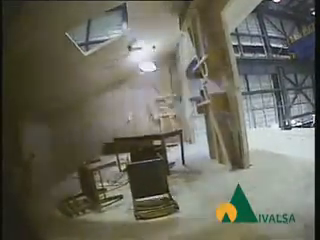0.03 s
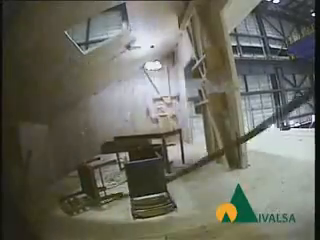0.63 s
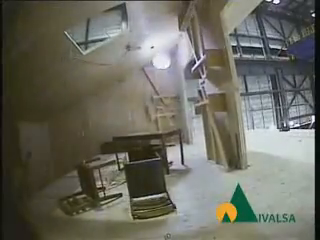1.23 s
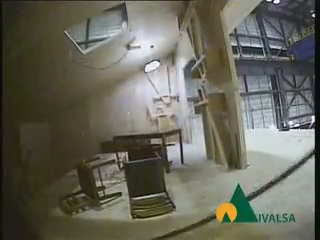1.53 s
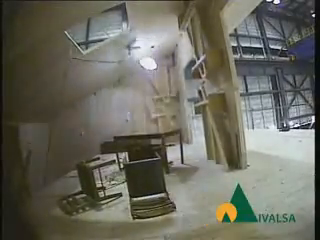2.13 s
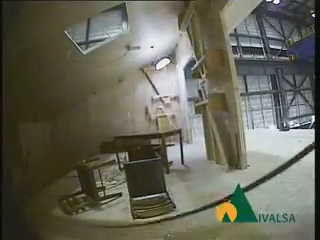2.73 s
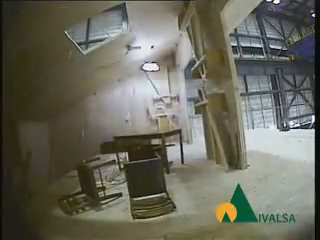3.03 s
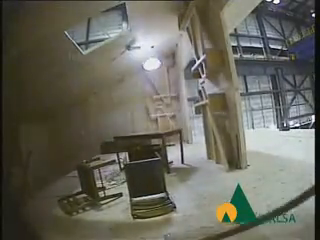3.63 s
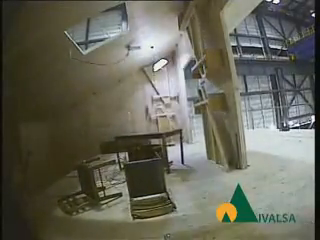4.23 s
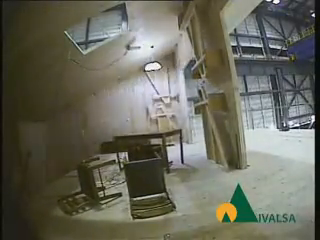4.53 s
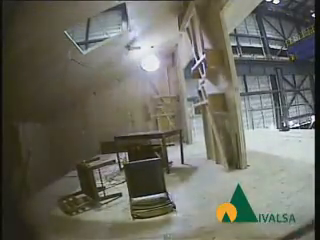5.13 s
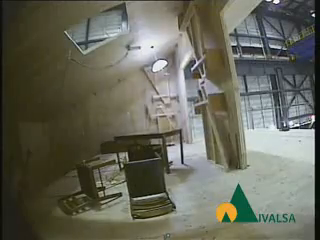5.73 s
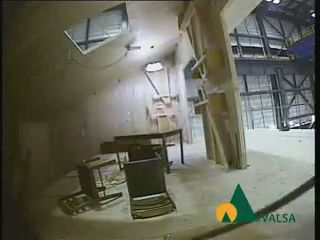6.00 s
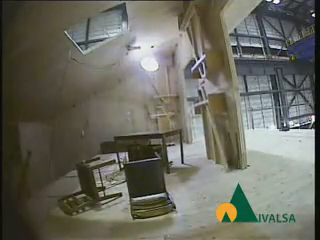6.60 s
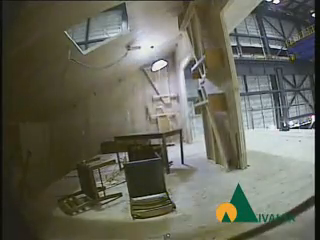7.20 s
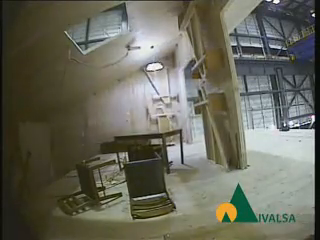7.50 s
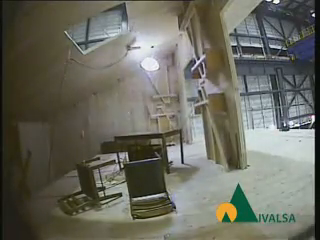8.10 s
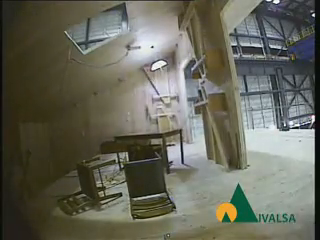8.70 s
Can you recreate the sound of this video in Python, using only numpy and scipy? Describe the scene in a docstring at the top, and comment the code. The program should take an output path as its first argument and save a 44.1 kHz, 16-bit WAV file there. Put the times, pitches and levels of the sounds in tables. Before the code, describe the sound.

Furniture crashes and rattles over a deep rumble inside a shaking wooden house, giving way to thumps and hydraulic whine.

```python
"""Rumble, clatter and banging furniture, choked briefly by hard lurches: inside a timber house shaken on a
hydraulic platform in a large hall. Joints crack, legs squeak, metal parts clink and panels boom.
Valves hiss throughout; as the shaking eases, the frame thumps and the pumps throb and whine louder.
Each hard lurch pumps the room air and pins the microphone amplifier. Only the left channel is live."""
import sys
import numpy as np
from scipy import signal
from scipy.fft import rfft, irfft, next_fast_len
from scipy.io import wavfile
from scipy.ndimage import uniform_filter1d

SR = 44100
rng = np.random.default_rng(int(sys.argv[2]) if len(sys.argv) > 2 else 0)


def master_out(mix):
    """Clip the mix to full scale and print it as 16-bit PCM to the path in sys.argv[1]."""
    frames = np.transpose(np.atleast_2d(mix))
    ceiling = np.clip(frames, -1, 1)
    pcm = np.round(ceiling * 32767).astype(np.int16)
    wavfile.write(sys.argv[1], SR, pcm)


N = 394694
T = np.arange(N) / SR

# low resonances of platform and frame: f/Hz, half-width/Hz, level/dB
FRAME_MODES = [(64.2, 13, 3), (127.8, 12, -0.5)]
# modes of the metal fittings: f/Hz, level/dB, t60/s
FITTING_MODES = [(2820, -2, 0.93), (3450, -4, 0.2), (3640, 4, 0.21), (3780, -1.5, 0.55)]
# spectrum of a wooden snap: f/Hz, level/dB
SNAP_SPECTRUM = [(300, -21), (1300, 8.5), (2200, 8), (3400, 11.5), (4500, -1), (6500, -2), (9500, -16.5)]
# furniture hitting floor and walls: t/s, thud/dB, most excited f/Hz, snap/dB, rattle/dB
FURNITURE_HITS = [(0.286, -18, 328, -42.5, -45), (.328, -25.5, 1040, -43, -50),
                  (0.395, -26.5, 1210, -38.5, -53), (0.478, -26, 960, -40.5, -50),
                  (0.636, -24.5, 1380, -47, -41), (.66, -19, 600, -46, -54), (0.791, -25.5, 617, -51, -56),
                  (1.039, -28.5, 706, -44, -41.5), (1.35, -17.5, 886, -40.5, -32),
                  (1.424, -23, 586, -45, -44), (1.489, -22, 990, -45.5, -42.5),
                  (1.655, -25.5, 1010, -42.5, -45.5), (1.705, -20, 690, -48, -47.5),
                  (1.79, -18.5, 397, -58, -58), (2.3, -23.5, 352, -62, -63.5),
                  (2.872, -25.5, 710, -58, -53), (3.281, -21, 790, -44, -53), (3.306, -16.5, 504, -54, -57),
                  (3.386, -18.5, 563, -53.5, -54), (3.815, -37, 980, -46.5, -46.5),
                  (4.049, -30.5, 700, -60, -61.5), (5.734, -31.5, 1260, -60.5, -65)]


def amp(db):
    """Decibels to gain."""
    return 10 ** (np.asarray(db) / 20)


def falloff(t, t60_s):
    """Gain falling 60 dB in t60_s."""
    return amp(-60 * t / t60_s)


def unit(x):
    """Scales to rms 1."""
    return x / np.sqrt(np.mean(x ** 2) + 1e-20)


def level(rows, column=1):
    """Gain over time from a dB column."""
    rows = np.array(rows)
    return amp(np.interp(T, rows[:, 0], rows[:, column]))


def read(points, hz):
    """Reads a table on a log-frequency axis."""
    f, value = np.transpose(points)
    return np.interp(np.log(hz + 1), np.log(f + 1), value)


def colour(x, spectrum):
    """Filters x by a spectrum; rms 1."""
    gain = amp(read(spectrum, np.fft.rfftfreq(len(x), 1 / SR)))
    return unit(irfft(rfft(x) * gain, len(x)))


def noise(spectrum, size=N):
    """Steady coloured noise."""
    return colour(rng.standard_normal(next_fast_len(size)), spectrum)[:size]


def resonance(hz, half_width_hz, size=N):
    """Noise-driven resonance, rms 1; at 0 Hz, a random wander."""
    padded = next_fast_len(size)
    offset = (np.fft.rfftfreq(padded, 1 / SR) - hz) / half_width_hz
    return unit(irfft(rfft(rng.standard_normal(padded)) / (1 + offset ** 2), padded)[:size])


def add(mix, s, sound):
    """Adds a sound at time s."""
    part = mix[max(round(s * SR), 0):][:len(sound)]
    part += sound[:len(part)]


def ring(modes, detune):
    """One blow: randomly detuned modes start together and decay; rms 1 over the first 20 ms."""
    t, out = np.arange(SR // 2) / SR, 0
    for hz, db, t60_s in modes:
        tuned_hz = hz * (1 + detune * rng.uniform(-1.03, 1))
        out += rng.choice([-1, 1]) * amp(db) * falloff(t, t60_s) * np.sin(2 * np.pi * tuned_hz * t)
    return out / np.sqrt(np.mean(out[:SR // 50] ** 2))


def impacts(spectrum, per_s, spread_db, t60_s, objects):
    """Loose objects, each with its own short ring, struck at random with uneven force."""
    t, out = np.arange(SR // 8) / SR, np.zeros(next_fast_len(N))
    for _ in range(objects):
        force = amp(spread_db * np.minimum(rng.exponential(1, N), 3))
        blows = force * (rng.random(N) < per_s / objects / SR)
        body = rng.standard_normal(len(t)) * falloff(t, t60_s)
        out[:N] += signal.oaconvolve(blows, body)[:N]
    return colour(out, spectrum)[:N]


def hall(x, wet_db):
    """Adds the hall's diffuse tail."""
    reverb_times = [(1000, 0.92), (4000, 0.89), (9000, 1)]  # f/Hz, t60/s
    hz, t, bands = signal.stft(rng.standard_normal(SR), SR, nperseg=256)
    tail = signal.istft(bands * falloff(t, read(reverb_times, hz)[:, None]), SR, nperseg=256)[1]
    wet = signal.oaconvolve(x, tail / np.linalg.norm(tail))[:N]
    return (x + amp(wet_db) * wet) / np.hypot(1, amp(wet_db))


def shaken(db, exponent):
    """Gain of a layer growing as a power of the shaking force; db applies at 0 dB force."""
    force = [(0, -1), (.15, -9.5), (.33, 1), (.85, 3), (1.05, -0.5), (1.36, 2), (1.6, -1), (1.8, 1.5),
             (2.02, -3.5), (2.3, 0.5), (2.55, -0.5), (3.33, 2), (3.58, -0.5), (3.9, 0), (4.25, -3.5),
             (5.45, -6), (5.8, -5.5), (8.95, -7)]  # surges, then eases: t/s, level/dB
    return amp(db) * level(force) ** exponent


def hydraulics(whine_hz=529.4):
    """Oil hisses through valves; the pumps throb and whine unsteadily."""
    pump_load = [(0, -48.5, -34, -28.5), (5.3, -48.5, -25, -36.5), (6.3, -41, -18.5, -31.5),
                 (7.9, -37, -20.5, -30), (8.3, -37.5, -16, -32), (8.95, -44, -17.5, -29.5)]  # t/s, whine/dB, throb/dB, hiss/dB
    hiss_spectrum = [(100, 14.5), (320, 6.5), (450, -6), (750, -9), (1000, 3), (1400, -5), (1900, -22.5),
                     (2900, -28), (3550, -26), (4400, -37.5), (6400, -35.5), (9500, -51)]  # f/Hz, level/dB
    cycles = np.cumsum(whine_hz * (1 + 0.0027 * resonance(0, 5.25))) / SR
    whine = np.sqrt(2) * np.sin(2 * np.pi * cycles) * amp(1.6 * resonance(0, 17))
    throb = unit(sum(amp(db) * resonance(hz, half_width_hz) for hz, half_width_hz, db in FRAME_MODES))
    hiss = noise(hiss_spectrum)
    return whine * level(pump_load, 1) + throb * level(pump_load, 2) + hiss * level(pump_load, 3)


def joint_cracks():
    """A timber joint lets go with a snap that rings its fittings; the room carries it on."""
    cracks = [(3.801, -60, 0.78), (4.213, -56, 0.53), (4.768, -55, 0.64), (5.252, -55.5, 0.85),
              (5.52, -48, 1), (5.695, -53.5, 0.45), (6.2297, -49.5, 1), (6.367, -51.5, 0.51),
              (6.542, -47, 0.6), (6.686, -56, 0.61), (6.868, -51.5, 0.91), (7.206, -58, 0.3),
              (7.387, -51, 0.89), (8.031, -55, 0.44)]  # t/s, level/dB, tail t60/s
    t, out = np.arange(SR // 2) / SR, np.zeros(N)
    attack = 1 - np.exp(-t / 0.00065)
    for start_s, db, t60_s in cracks:
        snap = noise(SNAP_SPECTRUM, len(t)) * (falloff(t, .05) + amp(-4) * falloff(t, t60_s))
        jangle = amp(-10) * ring(FITTING_MODES, detune=0.065)
        add(out, start_s, amp(db) * (snap + jangle) * attack)
    return out


def metal_clinks(db_per_octave=23.5, blur_hz=45):
    """Small metal parts ring over a bright chatter; repeated contact blurs each mode."""
    clinks = [(0.927, -47, -38.5, 0.032, 9200), (1.042, -56, -41.5, 0.35, 7610),
              (3.595, -56, -44.5, 0.048, 8620), (3.805, -60, -49.5, 0.19, 8150),
              (7.595, -66.5, -64, 0.7, 5585)]  # t/s, ring/dB, chatter/dB, t60/s, most excited f/Hz
    metal_modes = [(5585, 0.5), (6780, -2), (7610, 5), (8150, 4.5), (8620, -7), (9400, -9)]  # f/Hz, level/dB
    chatter_spectrum = [(1500, -16.5), (3700, 8.5), (5000, -2.5), (9500, -6.0)]  # f/Hz, level/dB
    t, out = np.arange(SR // 2) / SR, np.zeros(N)
    for start_s, ring_db, chatter_db, t60_s, pitch_hz in clinks:
        struck = [(hz, db - db_per_octave * abs(np.log2(hz / pitch_hz))) for hz, db in metal_modes]
        tones = unit(sum(amp(db) * resonance(hz, blur_hz, len(t)) for hz, db in struck))
        chatter = noise(chatter_spectrum, len(t)) * falloff(t, .6)
        add(out, start_s, (amp(ring_db) * tones + amp(chatter_db) * chatter) * falloff(t, t60_s))
    return hall(out, wet_db=-5.5)


def leg_squeaks(scrape_db=-10.5, fade_db=7.5):
    """Furniture legs stick and slip: a rough tone over a scrape, fading as the leg comes to rest."""
    squeaks = [(1.1, 0.061, 1093, -33), (3.805, 0.088, 1050, -24.5), (4.783, 0.13, 950, -37),
               (5.529, 0.064, 1042, -28.5), (5.639, 0.13, 1017, -36), (6.04, 0.19, 1166, -42.5),
               (6.431, 0.061, 960, -34)]  # t/s, length/s, f/Hz, level/dB
    out, jitter = np.zeros(N), resonance(0, 240)
    for start_s, length_s, hz, db in squeaks:
        slip = jitter[(T > start_s) & (T < start_s + length_s)]
        size = len(slip)
        tone = np.sin(2 * np.pi * np.cumsum(hz * (1 + .072 * slip)) / SR)
        scrape = amp(scrape_db) * resonance(hz, hz / 2, size)
        fade = amp(-fade_db * np.linspace(0, 1, size))
        add(out, start_s, amp(db) * unit((tone + scrape) * fade) * signal.windows.tukey(size, .05))
    return hall(out, wet_db=-1.0)


def panel_booms(rise_s=0.016):
    """A flexing wall or floor panel lets go and drones in a broad, low resonance."""
    booms = [(3.29, -24, 434, 0.74), (5.73, -23.5, 273, 2.1), (6.83, -22, 246, 1.3),
             (7.769, -24, 297, 1.12), (8.8, -20, 183, 2.5)]  # t/s, level/dB, f/Hz, t60/s
    t, out = np.arange(SR) / SR, np.zeros(N)
    for start_s, db, hz, t60_s in booms:
        envelope = np.minimum(t / rise_s, 1) * falloff(t, t60_s)
        add(out, start_s, amp(db) * resonance(hz, 0.25 * hz, len(t)) * envelope)
    return out


def frame_thumps(rise_s=0.016, t60_s=.5):
    """The frame drops back onto its base, ringing its low modes."""
    thumps = [(5.389, -19), (5.70, -17.5), (6.439, -18), (6.817, -14), (7.15, -14.5), (7.27, -12.5),
              (7.82, -15.5), (8.33, -16.5)]  # t/s, level/dB
    modes = [(hz, db, t60_s) for hz, _, db in FRAME_MODES]
    t, out = np.arange(SR // 2) / SR, np.zeros(N)
    for start_s, db in thumps:
        add(out, start_s, amp(db) * ring(modes, detune=.1) * np.minimum(t / rise_s, 1))
    return out


def fitting_rattle(rise_s=0.0033, settle_t60_s=0.98):
    """Loose fittings rattle a little with the shaking and in a dying flurry after each bang."""
    spectrum = [(400, -18), (1300, 16), (2000, 4.5), (2900, 1), (3650, 7), (4400, -15), (6500, -10.5),
                (9500, -29.5)]  # f/Hz, level/dB
    power = shaken(-54.5, exponent=0.88) ** 2
    for start_s, *_, db in FURNITURE_HITS:
        age_s = np.maximum(T - start_s, 0)
        power += (amp(db) * np.minimum(age_s / rise_s, 1) * falloff(age_s, settle_t60_s)) ** 2
    ticks = impacts(spectrum, per_s=160, spread_db=2.0, t60_s=0.032, objects=8)
    return unit(hall(ticks, wet_db=-5.0)) * np.sqrt(power)


def board_clatter():
    """Boards knock about, louder with harder shaking."""
    spectrum = [(90, -13.5), (190, -1.5), (260, 5), (350, 2), (480, -4.5), (700, -6.5), (1000, -11.5),
                (1400, -17), (2000, -32), (9000, -75.5)]  # f/Hz, level/dB
    knocks = impacts(spectrum, per_s=200, spread_db=3.0, t60_s=0.054, objects=12)
    return unit(hall(knocks, wet_db=-4.5)) * shaken(-25.5, exponent=1.18)


def furniture_bangs(contacts=3, bounce_s=0.024, bounce_db=-6, db_per_octave=9):
    """A chair or table lands and bounces to rest; each contact is a thud, a snap and a jangle."""
    wood_modes = [(69, 17, 0.38), (191.1, 14, 0.43), (347.8, 6.5, 0.15), (494.7, -2.5, 0.19),
                  (666.7, -4.5, 0.16), (943, -0.5, 0.086), (1290, 3, 0.034), (1603, -11.5, 0.14)]  # floor and furniture: f/Hz, level/dB, t60/s
    t, out = np.arange(SR // 2) / SR, np.zeros(N)
    snap_envelope = (1 - np.exp(-t / 0.0033)) * falloff(t, 0.36)  # soft rise: legs and rails land in turn
    for start_s, thud_db, pitch_hz, snap_db, rattle_db in FURNITURE_HITS:
        struck = [(hz, db - db_per_octave * abs(np.log2(hz / pitch_hz)), t60_s)
                  for hz, db, t60_s in wood_modes]
        for k in range(contacts):
            snap = amp(snap_db) * noise(SNAP_SPECTRUM, len(t)) * snap_envelope
            thud = amp(thud_db) * ring(struck, detune=.12)
            jangle = amp(rattle_db - 13) * ring(FITTING_MODES, detune=.015)
            contact_s = start_s + k * bounce_s * rng.uniform(.75, 1.1)
            add(out, contact_s, amp(k * bounce_db) * (thud + snap + jangle))
    return hall(out, wet_db=-5.5)


def frame_rumble(rock_hz=6.67, swell_db=2.5):
    """The shaken frame rumbles, swelling and sinking as it rocks."""
    spectrum = [(14, -19.5), (26, 3.5), (42, -6.5), (64, 1.5), (95, -7), (130, -6), (195, -7.5), (270, -16),
                (1500, -89)]  # f/Hz, level/dB
    return noise(spectrum) * shaken(-16, exponent=1) * amp(swell_db * resonance(rock_hz, 1.8))


def air_pressure(trough=0.37, crest=0.29):
    """Swaying walls pump the room below hearing; a lurch is a trough and jolt between two crests."""
    lurches = [(0.059, 16.5), (0.153, 6.5), (0.248, -5), (0.459, -6), (0.514, -5.5), (0.789, -7.5),
               (0.869, -7.5), (0.986, -7), (1.23, -9), (1.477, -8.5), (1.876, 0), (1.995, 10.5),
               (2.344, -8), (3.566, -6.5), (3.698, -5.5), (4.033, -10.5), (4.167, 6), (4.333, -8),
               (4.638, -3.5), (4.751, -9), (4.936, 0), (5.075, -4.5), (5.374, 5)]  # t/s, jolt/dB
    sway = resonance(11.0, 6.8) * level([(5.9, -30), (6.3, -12), (8.95, -17)])
    dips, crests = np.zeros(N), np.zeros(N)
    for centre_s, db in lurches:
        gap_s = abs(T - centre_s)
        jolt = amp(db) * np.exp(-(gap_s / .012) ** 2)  # the frame reverses
        dips += trough * np.exp(-(gap_s / .032) ** 2) + jolt
        crests = np.maximum(crests, np.exp(-((gap_s - .068) / .022) ** 2))  # neighbours share a crest
    return sway - dips + crest * crests


def scene():
    """All sources reach one microphone, on the left."""
    house = frame_rumble() + board_clatter() + fitting_rattle()
    blows = furniture_bangs() + panel_booms() + frame_thumps()
    background = hydraulics() + joint_cracks() + metal_clinks() + leg_squeaks()
    return np.array([house + blows + background + air_pressure(), np.zeros(N)])


def record(dry, knee=0.0025, coupling_hz=9, cutoff_hz=9850):
    """The amplifier pins at its rails; its coupling capacitor drains the pinned level away."""
    din = signal.lfilter(*signal.butter(2, 180, "high", fs=SR), dry[0])
    din_rms = np.sqrt(abs(uniform_filter1d(din ** 2, SR // 3)))
    lower_rail = -np.maximum(0.86 - 2.95 * din_rms, .25)  # sustained din draws both rails inwards
    upper_rail = np.maximum(0.883 - 4.0 * din_rms, .3)
    left = knee * np.logaddexp(dry[0] / knee, lower_rail / knee)
    left = -knee * np.logaddexp(-left / knee, -upper_rail / knee)
    left = signal.lfilter(*signal.butter(1, coupling_hz, "high", fs=SR), left)
    left *= signal.windows.tukey(N, .001)
    dead_right = amp(-90) * rng.standard_normal(N)
    lowpass = signal.firwin(511, cutoff_hz, window=("kaiser", 9), fs=SR)
    return signal.oaconvolve(np.array([left, dead_right]), lowpass[None], "same")


dry = scene()
out = record(dry)
master_out(out)
```